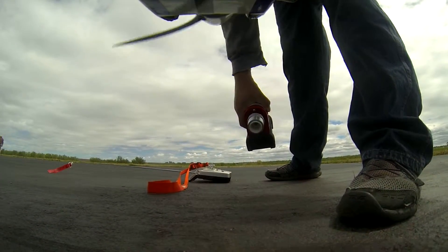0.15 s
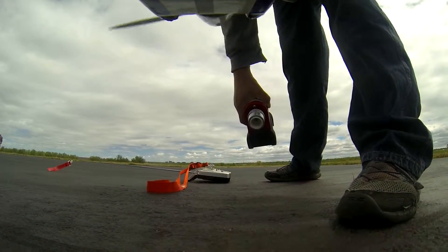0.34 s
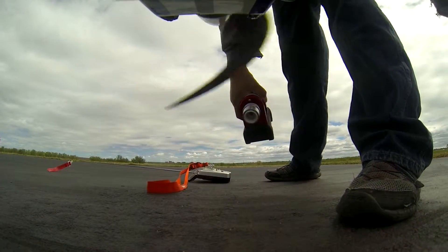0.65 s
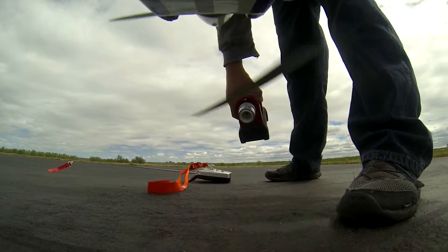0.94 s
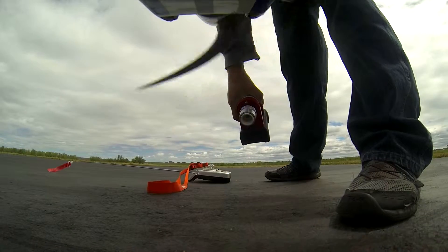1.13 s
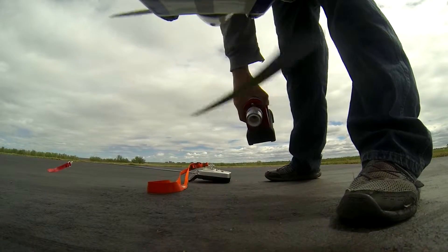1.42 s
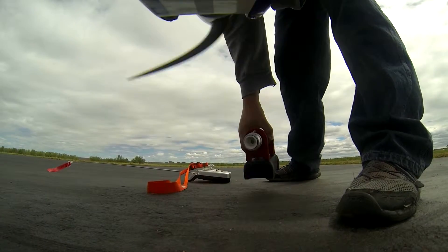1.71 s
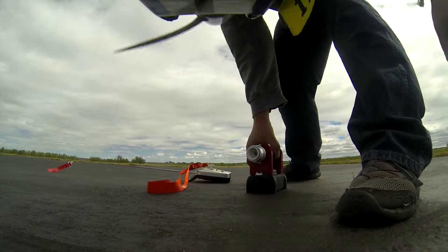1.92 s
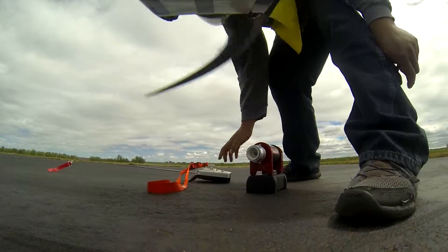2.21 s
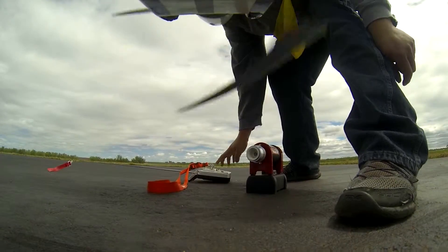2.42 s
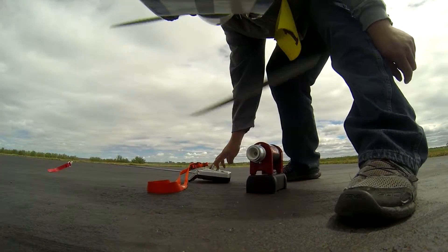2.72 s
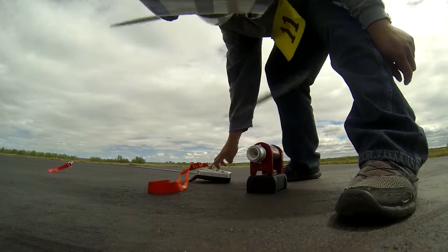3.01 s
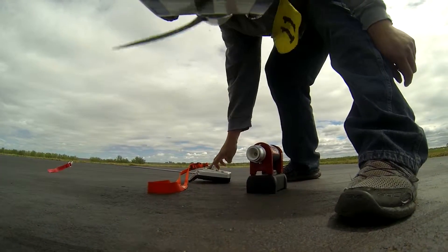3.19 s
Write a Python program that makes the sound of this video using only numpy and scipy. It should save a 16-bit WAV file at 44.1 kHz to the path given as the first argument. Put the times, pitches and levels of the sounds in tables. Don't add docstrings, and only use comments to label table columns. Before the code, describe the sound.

A little two-stroke engine putters steadily, shaking loose panels, then speeds up at the last moment

```python
import sys
import numpy as np
from scipy import signal
from scipy.io import wavfile

SR = 44100
rng = np.random.default_rng(int(sys.argv[2]) if len(sys.argv) > 2 else 0)


def wav_out(sig):
    wavfile.write(sys.argv[1], SR, np.round(np.clip(np.atleast_2d(sig).T, -1, 1) * 32767).astype(np.int16))


def voltage_ratio(level):
    return 10 ** (np.asarray(level, float) / 20)


N = 147735
RUN_IN = 22050
TIME_S = np.arange(-RUN_IN, N) / SR

# start_s, speed_turns_per_s, unevenness (+1 even turns fire hard, -1 odd turns, 0 alike)
CRANK_MOTION = [(0.0, 19.86, -0.07), (0.17, 19.93, -1.01), (0.361, 19.92, -0.18), (0.537, 17.7, -0.55),
                (0.809, 19.65, -1.37), (1.016, 19.81, -0.97), (1.2, 18.08, -0.04), (1.411, 18.81, 0.84),
                (1.541, 18.67, 1.15), (1.662, 19.9, 0.88), (2.026, 18.95, 1.13), (2.17, 19.66, 0.74),
                (2.252, 19.01, 1.41), (2.433, 18.98, 0.52), (2.888, 18.67, 0.74), (3.046, 18.83, 0.12),
                (3.148, 22.2, -0.27), (3.35, 24.56, 0.5)]


def crank():
    start_turn, surge_turns = -.3334, .0714
    start_s, speed_turns_per_s, unevenness = np.transpose(CRANK_MOTION)
    mean_turns = np.cumsum(np.interp(TIME_S, start_s, speed_turns_per_s)) / SR
    mean_turns = mean_turns - mean_turns[RUN_IN] + start_turn
    uneven = np.interp(TIME_S, start_s, unevenness)
    two_turn_swing = .5 - abs(mean_turns % 2 - 1)
    return mean_turns + surge_turns * uneven * two_turn_swing, uneven


def each_turn(angle_turns, rise_turns, fall_turns, sharp=False):
    turns, uneven = crank()
    k = np.round(turns - angle_turns).astype(int)
    off = turns - angle_turns - k
    bump = np.exp(-.5 * (off / np.where(off < 0, rise_turns, fall_turns)) ** 2)
    if sharp:
        bump = np.where(off < 0, bump, np.exp(-abs(off) / fall_turns))
    hard = np.clip(uneven, -1, 1) * (1 - 2 * (k % 2))
    chance = rng.standard_normal(100)[k + 20]
    return bump, hard, chance


MOUNT_SHOVES = [
    (.169, .064, -.232, -.13),
    (.52, .063, -.115, -.015),
    (.838, .056, .174, -.105),
]


def mount():
    mount_hz, mount_t60_s = 79.9, .213
    buffet_db, buffet_cut_hz = -24, 119
    force = voltage_ratio(buffet_db) * low_pass(rng.standard_normal(N + RUN_IN), buffet_cut_hz)
    for angle_turns, width_turns, push, extra in MOUNT_SHOVES:
        bump, hard, chance = each_turn(angle_turns, width_turns, width_turns)
        force += bump * (push + extra * hard) * (1 + .08 * chance)
    r = voltage_ratio(-60 / (mount_t60_s * SR))
    w = 2 * np.pi * mount_hz / SR
    return signal.lfilter([1, -2, 1], [1, -2 * r * np.cos(w), r * r], force)


# start_s, peak_db
PANEL_KNOCKS = [(0.1735, -5), (0.3072, -13), (0.3581, -14), (0.4175, -0.5), (0.5173, -1.5), (0.6255, -6.5),
                (0.7986, -11), (1.0969, -7), (1.1566, -4), (1.402, -3), (1.521, -16.5), (1.5729, -10),
                (1.737, -4.5), (1.7782, -12.5), (2.0423, -11.5), (2.0906, -1), (2.2483, -8), (2.3486, -9),
                (2.4146, -10), (2.4885, -2.5), (2.5571, -6), (2.8046, -9), (2.8749, -8.5), (2.911, -2.5),
                (3.2317, -6.5), (3.2725, -2)]


def knocks():
    fall_s, length = .006, 1500
    out = np.zeros(N + RUN_IN + SR)
    for start_s, peak_db in PANEL_KNOCKS:
        start = int(start_s * SR) + RUN_IN
        out[start:start + length] += voltage_ratio(peak_db) * np.exp(-np.arange(length) / SR / fall_s)
    return out[:N + RUN_IN]


# start_s, rattle_level_db
PANEL_LOOSENESS = [(0.0, -13.5), (0.17, -14), (0.21, -17.5), (0.39, -14), (0.82, -16.5), (1.3, -13.5),
                   (1.31, -10), (1.47, -19), (1.59, -13), (1.6, -17.5), (2.09, -14.5), (2.34, -16.5),
                   (2.35, -14), (2.43, -15.5), (2.53, -13.5), (2.54, -14), (3.34, -15.5), (3.35, -32)]


def looseness_db():
    return np.interp(TIME_S, *np.transpose(PANEL_LOOSENESS))


# angle_turns, rise_turns, fall_turns, level_db, hard_firing_extra_db
PANEL_SHAKES = [
    (.07, 0.021, 0.11, -4.74, 5),
    (.37, 0.09, 0.21, -7.5, -1.9),
    (0.822, 0.12, 0.29, -4, -0.75),
]


def rattles():
    rest_db, scatter_db = -11, 1.8
    rattles_per_s, spread_db = 1400, 2.5
    n = N + RUN_IN
    shake = voltage_ratio(rest_db)
    for angle_turns, rise_turns, fall_turns, level_db, extra_db in PANEL_SHAKES:
        bump, hard, chance = each_turn(angle_turns, rise_turns, fall_turns)
        shake = shake + bump * voltage_ratio(level_db + extra_db * hard + scatter_db * chance)
    hits = rng.random(n) < rattles_per_s / SR
    hit_level = voltage_ratio(spread_db * np.minimum(rng.exponential(1, n), 4))
    return voltage_ratio(looseness_db()) * rms_one(shake * hits * hit_level)


# pitch_hz, width_hz, level_db
PANEL_MODES = [(50, 28.7, -3.5), (110, 44, -9.5), (184, 23.3, -15.5), (285, 55, -14.5), (400, 103.4, -4.5),
               (607, 140, -10.5), (809, 78, -11), (1082, 110, -9.5), (1259, 170, -3), (1510, 160, -0.15),
               (1711, 223, -4.1), (2195, 144, -13), (2600, 190, -23.5)]


def panels():
    case_low_hz, case_high_hz, case_cut_hz = 1000, 2000, 3200
    panel_knock_share = .6
    n = N + RUN_IN
    knock = knocks()
    panel_drive = rattles() + panel_knock_share * knock
    case_drive = rattles() + knock
    rings = 0
    for pitch_hz, width_hz, level_db in PANEL_MODES:
        drive = case_drive if case_low_hz < pitch_hz < case_high_hz else panel_drive
        ring = resonance(drive * rng.standard_normal(n) + 1e-18, pitch_hz, width_hz)
        rings = rings + voltage_ratio(level_db) * np.sqrt(SR / 20 / width_hz) * ring
    return low_pass(rings, case_cut_hz)


# angle_turns, fall_turns, level_db, hard_firing_extra_db, brightness_db
METAL_TICKS = [
    (0, .036, 0.2, 2, 0),
    (.335, .03, -10, .3, 3),
    (.54, .035, -7, 0, -14),
    (.59, .022, -18, 0, 9),
    (.8, .05, -17, 0, -4),
]
# pitch_hz, width_hz, level_db, brightness_share (0-1), grind_db
METAL_MODES = [(3030, 220, -4, 0, -10), (3438, 260, -1.7, 0.8, -13), (4080, 170, -5.5, .2, -20.5),
               (4550, 300, -9.5, .2, -21.5), (5200, 275, -3.5, 0.7, -15), (6650, 500, -14, 0.8, -20),
               (7300, 290, -21.5, .9, -23), (9000, 700, -18, 0.8, -20.5), (10000, 500, -22, 1, -21.5),
               (10860, 500, -29, .9, -23.5), (11900, 680, -32.5, 0.8, -25), (13500, 1200, -44, .9, -27)]


def metal():
    tick_db, tick_scatter_db = -42.5, 2.2
    grind_smooth, looseness_share = 0.29, .7
    n = N + RUN_IN
    ticks = []
    for angle_turns, fall_turns, level_db, extra_db, bright_db in METAL_TICKS:
        bump, hard, chance = each_turn(angle_turns, 0.0031, fall_turns, sharp=True)
        ticks.append((bump, level_db + extra_db * hard + tick_scatter_db * chance, bright_db))
    grit = grind_smooth + abs(signal.lfilter([.1], [1, -.99], rng.standard_normal(n)))
    out = 0
    for pitch_hz, width_hz, mode_db, bright_share, grind_db in METAL_MODES:
        drive = voltage_ratio(grind_db) * grit
        for bump, level_db, bright_db in ticks:
            drive = drive + bump * voltage_ratio(level_db + bright_share * bright_db)
        out = out + voltage_ratio(mode_db) * resonance(drive * rng.standard_normal(n), pitch_hz, width_hz)
    return voltage_ratio(tick_db) * rms_one(voltage_ratio(looseness_share * looseness_db()) * out)


def resonance(x, pitch_hz, width_hz):
    r = np.exp(-np.pi * 1.55 * width_hz / SR)
    w = 2 * np.pi * pitch_hz / SR
    section = [(1 - r * r) / 2, 0, (r * r - 1) / 2, 1, -2 * r * np.cos(w), r * r]
    return signal.sosfilt([section, section], x)


def low_pass(x, cut_hz):
    return signal.sosfilt(signal.butter(4, cut_hz, fs=SR, output="sos"), x)


def rms_one(x):
    return x / np.sqrt(np.mean(x ** 2) + 1e-20)


def scene():
    low_cut_hz = 34
    felt = mount() + panels() + metal()
    heard = signal.sosfilt(signal.butter(2, low_cut_hz, "high", fs=SR, output="sos"), felt)
    return heard[None, RUN_IN:]


def top_cut(x):
    return signal.sosfilt(signal.butter(12, 15200, fs=SR, output="sos"), x)


def record(dry):
    top = 1.2
    mix = top * np.tanh(dry / top)
    return top_cut(mix)


dry = scene()
out = record(dry)
wav_out(out)
```